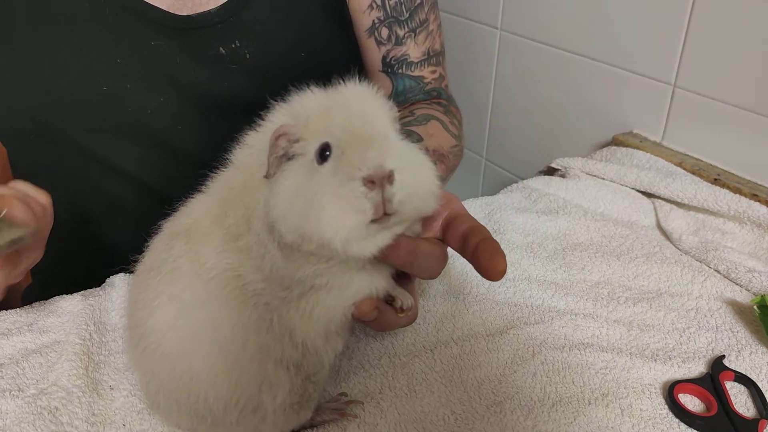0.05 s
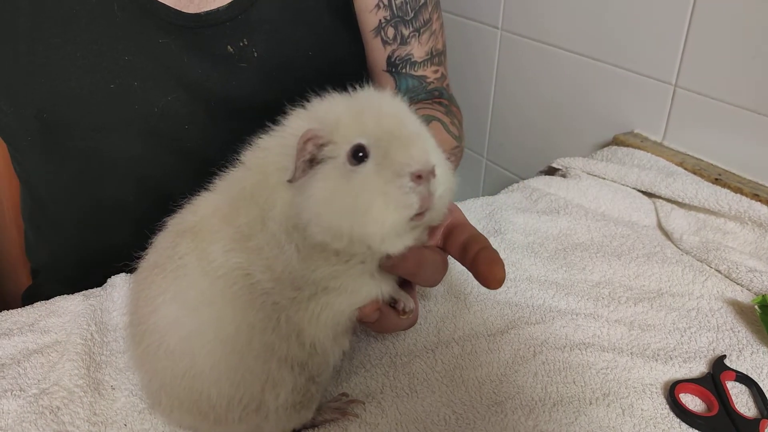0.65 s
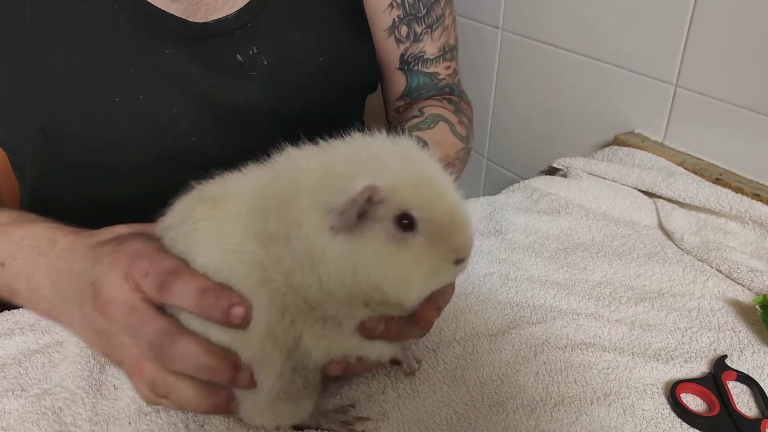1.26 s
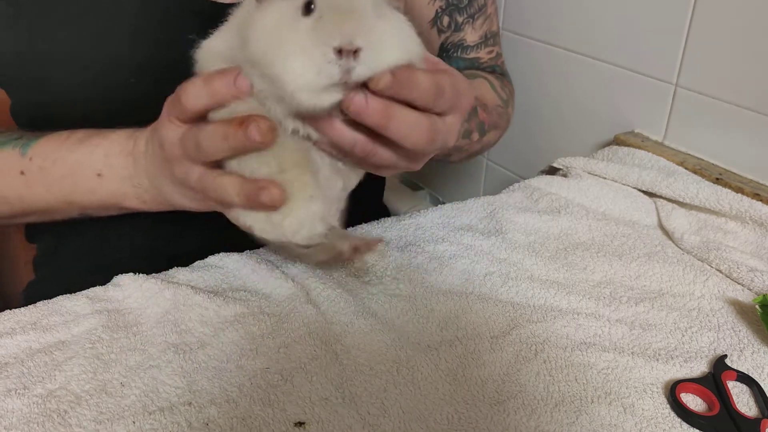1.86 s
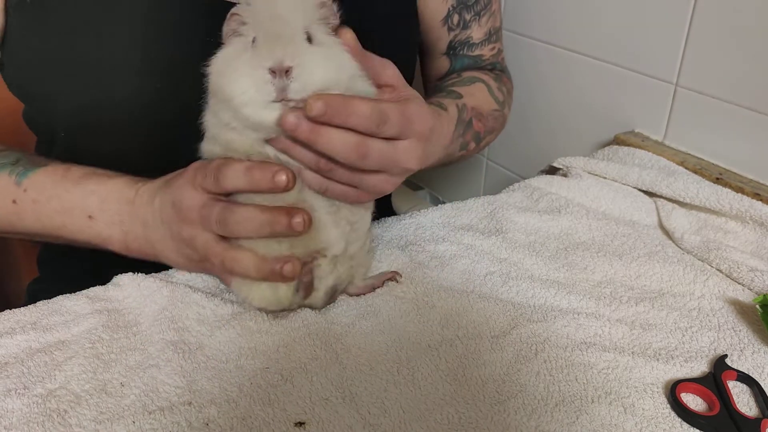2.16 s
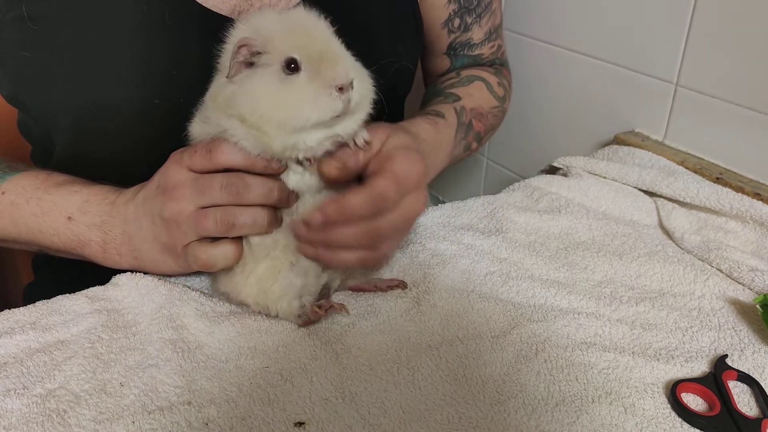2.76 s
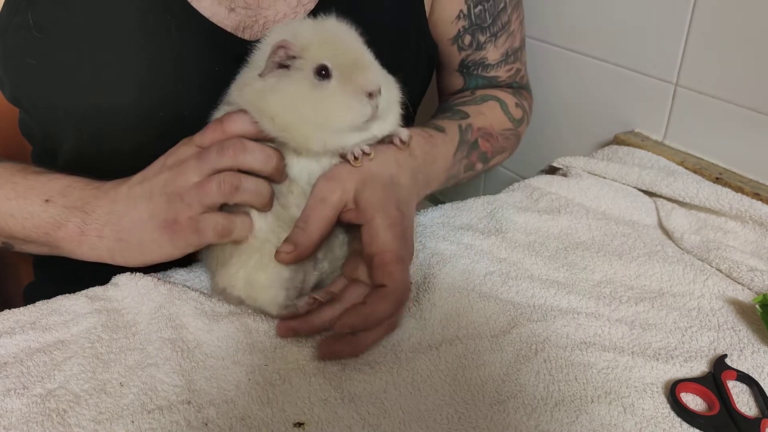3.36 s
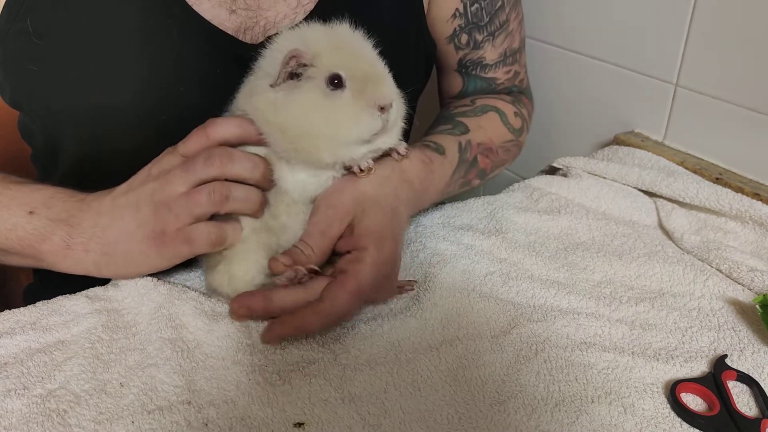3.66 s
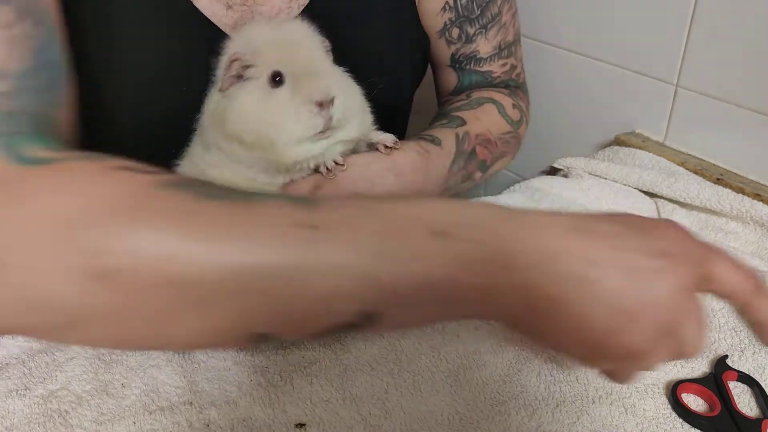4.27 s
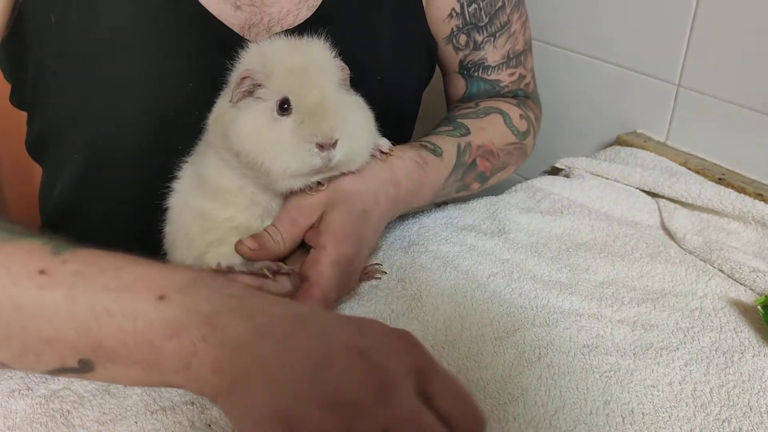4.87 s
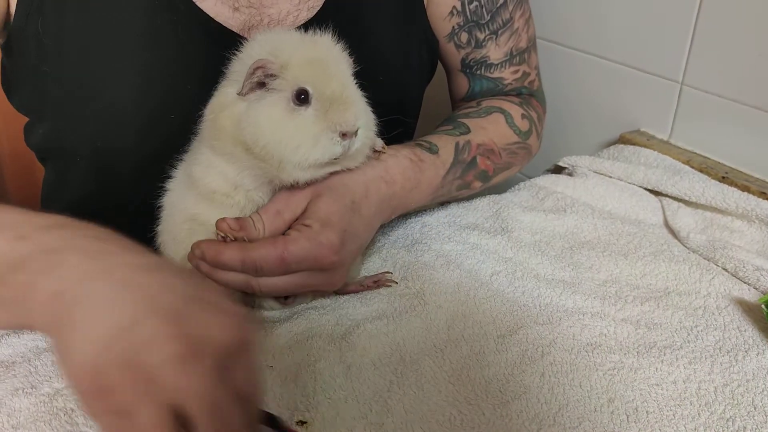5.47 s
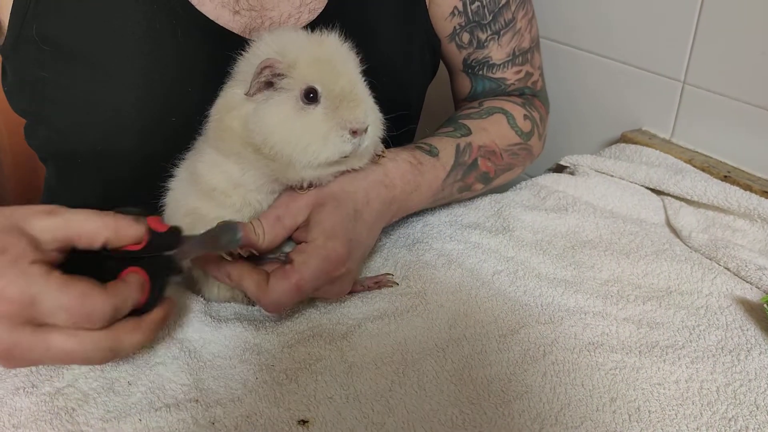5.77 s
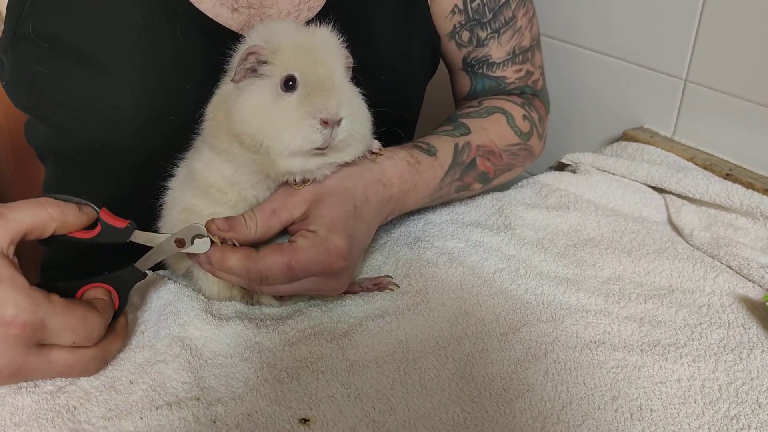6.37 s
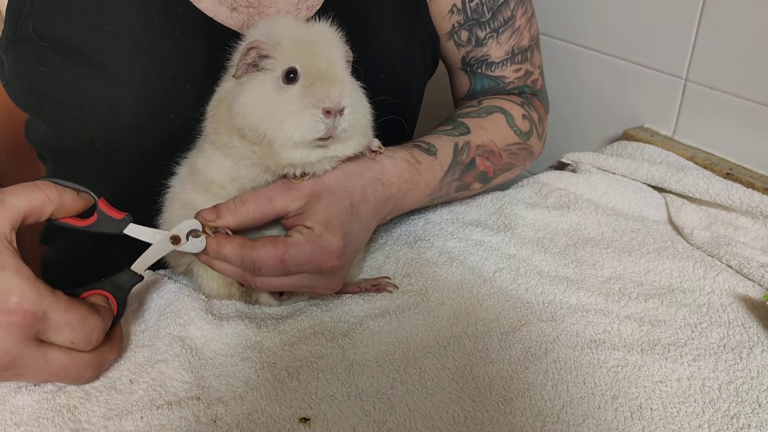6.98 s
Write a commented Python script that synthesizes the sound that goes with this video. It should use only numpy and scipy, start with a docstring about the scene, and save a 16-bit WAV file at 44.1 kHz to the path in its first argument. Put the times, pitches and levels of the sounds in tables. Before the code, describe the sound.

Faint claw ticks, towel scrapes and muffled bumps come from a guinea pig being picked up and held, over steady hum and hiss. After a barely audible squeak and the brush of an arm on cloth, nail clippers hit the table with one loud, bright clack, left of centre, echoing briefly off tiled walls. The arm slides back, small ticks and scuffs resume, and the microphone is lightly bumped.

```python
"""A small tiled room, two microphones, a guinea pig on a towel-covered table; hum and hiss throughout.
From 1 s the animal is lifted and held: fur and towel rustle, claws tick and scuff, with soft low bumps.
Near 3 s comes one faint squeak. An arm slides out for the nail clippers, and just after 5 s they knock
once, hard, on the table, left of centre; the room rings with it. The arm slides back, a few more ticks
and scuffs follow as the animal shifts, and a light handling bump on the microphone comes last."""
import sys
import numpy as np
from scipy import signal
from scipy.fft import rfft, irfft, next_fast_len
from scipy.io import wavfile

SR = 44100
rng = np.random.default_rng(int(sys.argv[2]) if len(sys.argv) > 2 else 0)


def output_pcm(signal):
    """Save a mono or channel-first signal as 16-bit PCM at the path in sys.argv[1].

    Samples are clipped to [-1, 1] before scaling.
    """
    pcm = np.clip(np.atleast_2d(signal).T, -1, 1) * 32767
    wavfile.write(sys.argv[1], SR, np.round(pcm).astype(np.int16))


N = 319284
TIME = np.arange(N) / SR


# clippers on the table, first touch, full blow and an early reflection 12 ms later: t/s, relative level/dB
KNOCK_HITS = [(5.1252, -16), (5.1262, 1), (5.1376, -11)]
# spectrum of the crack at the microphones: f/Hz, relative level/dB, left minus right/dB
KNOCK_COLOUR = [(35, -36, -0.5), (65, -23.5, 2), (140, -21, -2), (282, -14.5, -4.5), (405, -5, -2.5),
                (653, -5, 3.5), (1290, -8.5, 1.5), (1900, -3.5, 3.5), (2300, -2, 3.5), (3100, -3.5, 4.5),
                (3920, -13.5, 2), (5140, -25, -4), (6980, -42, -1), (14000, -52.5, -2.5)]

def knock(room, crack_db, wet_db, clack_db, clack_hz, clack_s, clack_wet_db, left_db):
    """Metal meets the table: a broad crack, and a bright clack that swells and dies in a few cycles."""
    t, crack, clack = TIME[:SR // 20], np.zeros((2, N)), np.zeros(N)
    spectra = [[(hz, db + side * left / 2) for hz, db, left in KNOCK_COLOUR] for side in (1, -1)]
    snap = np.array([impact(spectrum) for spectrum in spectra])
    swell = (t / clack_s) ** 2 * np.exp(2 - 2 * t / clack_s)
    burst = swell * np.sin(2 * np.pi * clack_hz * t)
    for s, db in KNOCK_HITS:
        add(crack, s, from_db(crack_db + db) * snap / np.linalg.norm(snap))
        add(clack, s, from_db(clack_db + db) * burst)
    return in_room(crack, room, wet_db) + pan(left_db) * in_room(clack, room, clack_wet_db)


# modes of table, clippers and room at the microphones: f/Hz, relative level/dB, left minus right/dB
KNOCK_MODES = [(71, -13, 5), (121, -13, 1), (181, -12, -3), (266, -10, -3), (331, -13, -3), (398, -8, 0),
               (488, -10, -5), (602, -8, 7), (715, -5, 0), (814, -8, -2), (858, -5, 5), (983, -5, 9),
               (1033, -7, -2), (1129, -4, -4), (1413, -5, 1), (1472, -5, 2), (1736, -6, -1), (2127, 0, 1),
               (2172, -3, 9), (2289, 0, 9), (2335, -4, 8), (2455, -4, 7), (2538, -3, 6), (2632, -5, 9),
               (2715, 0, 2), (2816, -4, 9), (2874, -5, 9), (3155, -5, 3), (3324, -6, 9), (6045, -31, -2),
               (7332, -34, -1), (7763, -35, 0), (8500, -37, -3), (8985, -35, -1)]

def ringing(ring_db, t60_ratio, right_lead_s):
    """The modes left sounding by the full blow; they last about as long as the room does."""
    t, out = TIME[:SR], np.zeros((2, N))
    blow_s = KNOCK_HITS[1][0]
    onset = 1 - np.exp(-t / 0.0026)
    for (hz, db, left_db), (phase, slant) in zip(KNOCK_MODES, rng.random((len(KNOCK_MODES), 2))):
        # each wave crosses the pair at its own slant and reaches the right microphone slightly earlier
        lead = np.array([[0], [right_lead_s * (1 - .5 * slant ** 2)]])
        t60 = t60_ratio * at_hz(ROOM_T60, hz)
        fade = from_db(ring_db + db - 60 * t / t60)
        tone = np.sin(2 * np.pi * (hz * (t + lead) + phase))
        add(out, blow_s, pan(left_db) * fade * onset * tone)
    return out


# claws and clipper handles, centred between the microphones: t/s, level/dB, f/Hz
TICKS = [(0.9812, -36, 2830), (0.9868, -35.5, 1810), (1.247, -41, 2780), (2.6885, -41, 3020),
         (3.020, -44, 1630), (3.7724, -34.5, 2580), (6.642, -39, 3600), (6.768, -48, 1700),
         (7.1575, -38.5, 3300)]

def ticks(t60_cycles):
    """Small hard contacts all ring for the same number of cycles, so higher ones are shorter."""
    return taps([(s, db, hz, t60_cycles / hz) for s, db, hz in TICKS], contact_cycles=0.047)


# soft low bumps, a brief low rub near 3.5 s and, last, a handling bump on the microphone:
# t/s, level/dB, hardness/(dB per octave)
BUMPS = [(0.981, -53, -1), (1.247, -39.5, -3.5), (1.320, -55.5, -9), (1.478, -46.5, 3.5), (3.515, -52, 0.5),
         (4.430, -47, -3.5), (4.530, -55, -4.5), (5.597, -38.5, 3), (7.157, -50, 2)]
# low modes of the padded table, also voicing the rub and the handling bump: f/Hz, relative level/dB, t60/s
LOW_MODES = [(62, -4.5, .17), (146.2, 1, 0.051), (314, 1, .04), (491, -4, 0.042)]

def low_bumps(pivot_hz, lag_cycles):
    """Each soft contact sounds the same few low modes; harder ones favour those above the pivot."""
    rings = []
    for s, db, hardness in BUMPS:
        for hz, mode_db, t60 in LOW_MODES:
            start = s + lag_cycles / hz   # low modes start later
            rings.append((start, db + mode_db + hardness * np.log2(hz / pivot_hz), hz, t60))
    return taps(rings, contact_cycles=.4)


# claws and hands scraping the towel: t/s, level/dB, fade/s, brightness/(dB per octave)
SCUFFS = [(1.468, -51, 0.042, -2.5), (1.535, -42.5, 0.035, 3), (1.568, -50, 0.022, -4.5),
          (2.688, -47.5, .004, 1), (3.980, -50.5, 0.018, -0.5), (5.600, -47, 0.033, -4.5),
          (6.642, -49.5, 0.033, -1), (6.982, -51, 0.029, 2.5), (7.157, -46.5, 0.012, 3)]
# spectrum of a scrape: f/Hz, relative level/dB
SCUFF_COLOUR = [(100, -23), (400, -2), (900, -1.5), (1400, -7), (2700, -0.5), (3400, -3.5), (4200, -11),
                (7000, -15), (10000, -29.5), (14000, -33)]

def scuffs(grain_db, catch_db, catches_per_s, rise_s):
    """Loops of towel catch and let go: uneven clumps of fine grains."""
    t, out = TIME[:SR // 3], np.zeros((2, N))
    for s, db, fade_s, tilt_db in SCUFFS:
        catching = catch_db * wander(catches_per_s, len(t))
        grains = diffuse(len(t)) * from_db(grain_db * rng.standard_normal(len(t)) + catching)
        stroke = from_db(db) * np.minimum(t / rise_s, 1) * np.exp(-t / fade_s)
        add(out, s - rise_s / 2, stroke * colour(grains, SCUFF_COLOUR, tilt_db))
    return out


# the animal is lifted or its weight is shifted on the table: t/s, level/dB, settling/s
BODY_SHIFTS = [(1.49, -60, .22), (1.9, -65.5, 1.2), (3.53, -63, .35), (5.7, -64, .25), (7.18, -63, .3)]
# spectrum of fur on the towel: f/Hz, relative level/dB
FUR_COLOUR = [(100, -10.5), (320, 0.5), (800, -11.5), (1500, -10), (2700, -27), (5000, -26), (14000, -52)]

def fur_rustle(rise_s, rest_db):
    """Fur rubs on the towel; each move builds up quickly and settles slowly."""
    moves = [from_db(db) * np.exp(np.minimum((TIME - s) / rise_s, (s - TIME) / settle_s))
             for s, db, settle_s in BODY_SHIFTS]
    return rubbing(moves, rest_db, FUR_COLOUR, uneven_db=3, slips_per_s=37)


# the arm reaches for the clippers and comes back: t/s at greatest speed, level/dB, length/s
ARM_STROKES = [(4.77, -59, .68), (5.43, -61, 0.57)]
# spectrum of skin on cloth: f/Hz, relative level/dB
SKIN_COLOUR = [(300, -29), (1400, -6), (2700, 10.5), (4500, 2), (7000, 0), (9000, -18.5), (14000, -6)]

def arm_slide(rest_db):
    """Skin rubs on cloth, each stroke one smooth arch of speed; at rest the hands hold the animal."""
    moves = [from_db(db) * np.cos(np.pi * np.clip((TIME - s) / length_s, -.5, .5))
             for s, db, length_s in ARM_STROKES]
    return rubbing(moves, rest_db, SKIN_COLOUR, uneven_db=3, slips_per_s=90)


# a faint squeak, centred: t/s, length/s, level/dB, first f/Hz, last f/Hz
SQUEAK = (2.94, 0.05, -65.5, 1379.5, 1721)

def squeak(waver_hz, wavers_per_s):
    """One thin, unsteady tone that swells and fades as its pitch rises."""
    s, length_s, db, first_hz, last_hz = SQUEAK
    along = np.clip((TIME - s) / length_s, 0, 1)
    hz = first_hz + (last_hz - first_hz) * along + waver_hz * wander(wavers_per_s)
    return from_db(db) * np.sin(np.pi * along) * np.sin(2 * np.pi * np.cumsum(hz) / SR)


# room tone at both microphones: f/Hz, relative level/dB
ROOM_TONE = [(20, 17), (60, 14), (110, 16), (200, 6), (450, 2.5), (850, 1.5), (1300, -5), (1700, -2),
             (2250, 5.5), (3100, -4), (4200, -12.5), (6500, -27), (8300, -23), (14000, -17.5)]
# hiss in the right channel alone: f/Hz, relative level/dB
RIGHT_HISS = [(1500, -38), (3000, 1.5), (3600, 6.5), (4500, 5.5), (4950, 9.5), (5600, -2.5), (7000, -18.5),
              (9000, -65)]
# mains hum, centred: f/Hz, relative level/dB
MAINS_HUM = [(99, -61), (199, -76), (299, -76)]

def background(air_db, air_left_db, hiss_db, hum_db, waver_rad):
    """Room tone from all sides, a band of hiss on the right, and a slightly wavering hum."""
    air = from_db(air_db) * pan(air_left_db) * colour(diffuse(N), ROOM_TONE)
    air[1] += from_db(hiss_db) * colour(rng.standard_normal(N), RIGHT_HISS)
    waver = waver_rad * wander(per_s=4)
    hum = sum(from_db(db + hum_db) * np.sin(2 * np.pi * hz * TIME + waver) for hz, db in MAINS_HUM)
    return air + np.sqrt(2) * hum


# decay of the small tiled room: f/Hz, t60/s
ROOM_T60 = [(60, 0.52), (300, 0.48), (800, 0.44), (1400, 0.43), (2700, 0.34), (5000, .34), (12000, 0.22)]

def room_response():
    """Dense echoes off the nearby tiles, each octave dying at its own rate; energy about 1 a side."""
    t, hz = TIME[:SR], np.maximum(np.fft.rfftfreq(SR, 1 / SR), 1)
    echoes, tail = rfft(diffuse(SR)), 0
    for centre in 2. ** np.arange(5, 15):
        band = irfft(echoes * np.maximum(0, 1 - abs(np.log2(hz / centre))), SR)
        tail = tail + band * from_db(-60 * t / at_hz(ROOM_T60, centre))
    onset = 1 - np.exp(-t / 0.00068)
    return unit_rms(tail * onset) / np.sqrt(SR)


# how alike the two microphones hear diffuse sound: f/Hz, correlation
MIC_LIKENESS = [(30, 0.24), (110, 0.27), (290, 0.62), (620, 0.38), (1300, -0.064), (2600, 0.2),
                (6000, 0.14), (14000, -0.049)]

def diffuse(count):
    """White noise arriving from all sides at two microphones."""
    size = next_fast_len(count)
    mid, side = rfft(rng.standard_normal((2, size)))
    alike = np.clip(at_hz(MIC_LIKENESS, np.fft.rfftfreq(size, 1 / SR)), -.99, .99)
    pair = np.sqrt(1 + alike) * mid + np.sqrt(1 - alike) * side * [[1], [-1]]
    return unit_rms(irfft(pair, size)[:, :count])


def in_room(x, room, wet_db):
    """The direct path to the microphones plus the echoes."""
    return x + from_db(wet_db) * signal.fftconvolve(np.atleast_2d(x), room, axes=1)[:, :N]


def impact(spectrum, size=4096):
    """The most abrupt causal pulse with this spectrum."""
    gain = from_db(at_hz(spectrum, np.fft.rfftfreq(size, 1 / SR)))
    cepstrum = irfft(np.log(gain))
    folded = np.r_[cepstrum[0], 2 * cepstrum[1:size // 2]]
    return irfft(np.exp(rfft(folded, size)))


def taps(rings, contact_cycles):
    """Each touch is one damped vibration; a soft contact takes longer to build it up."""
    t, out = TIME[:SR // 2], np.zeros(N)
    for s, db, hz, t60 in rings:
        onset = 1 - np.exp(-t * hz / contact_cycles)
        fade = from_db(db - 60 * t / t60)
        add(out, s, fade * onset * np.sin(2 * np.pi * hz * t))
    return out


def rubbing(moves, rest_db, spectrum, uneven_db, slips_per_s):
    """Friction noise that rises with each move and flutters as cloth sticks and slips."""
    effort = np.sqrt(from_db(rest_db) ** 2 + sum(move ** 2 for move in moves))
    grip = from_db(uneven_db * wander(slips_per_s))
    return effort * colour(diffuse(N) * grip, spectrum)


def colour(x, spectrum, tilt_db=0):
    """Give noise a spectrum, tilted per octave about 2 kHz; rms 1."""
    size = next_fast_len(x.shape[-1])
    hz = np.maximum(np.fft.rfftfreq(size, 1 / SR), 1)
    gain = from_db(at_hz(spectrum, hz) + tilt_db * np.log2(hz / 2000))
    return unit_rms(irfft(rfft(x, size) * gain, size)[..., :x.shape[-1]])


def wander(per_s, count=N):
    """Random values joined by straight lines."""
    return np.interp(TIME[:count] * per_s, np.arange(count), rng.standard_normal(count))


def at_hz(points, hz):
    """Read a table on a log-frequency axis."""
    table = np.array(points)
    return np.interp(np.log(np.maximum(hz, 1)), np.log(table[:, 0]), table[:, 1])


def from_db(db):
    """Decibels to gain."""
    return 10 ** (np.asarray(db) / 20)


def unit_rms(x):
    """Scale to rms 1."""
    return x / np.sqrt(np.mean(x ** 2) + 1e-20)


def pan(left_db):
    """Channel gains for a left-minus-right level."""
    return from_db([[left_db / 2], [-left_db / 2]])


def add(track, s, sound):
    """Mix a sound into a track from time s."""
    start = int(s * SR)
    track[..., start:start + sound.shape[-1]] += sound[..., :N - start]


def scene():
    """The table and the tiled room around it, heard from one microphone position."""
    room = room_response()
    clippers = knock(room, crack_db=3.5, wet_db=10,
                     clack_db=-8.7, clack_hz=2490, clack_s=0.00066, clack_wet_db=-13.5, left_db=8)
    ring = ringing(ring_db=-25, t60_ratio=0.88, right_lead_s=.00039)
    claws = in_room(ticks(t60_cycles=10.8), room, wet_db=-1.5)
    bumps = in_room(low_bumps(pivot_hz=200, lag_cycles=0.79), room, wet_db=-3.5)
    scrapes = in_room(scuffs(grain_db=4, catch_db=-0.5, catches_per_s=359, rise_s=.006), room, wet_db=-5.5)
    fur = fur_rustle(rise_s=0.087, rest_db=-75.5)
    arm = arm_slide(rest_db=-71)
    steady = background(air_db=-59.5, air_left_db=-0.4, hiss_db=-59.5, hum_db=-3, waver_rad=0.35)
    chirp = in_room(squeak(waver_hz=140.3, wavers_per_s=700), room, wet_db=-4)
    return clippers + ring + claws + bumps + scrapes + fur + arm + chirp + steady


def record(dry):
    """Both microphone channels are cut steeply above 14.4 kHz."""
    return signal.sosfilt(signal.ellip(10, .1, 70, 14400, fs=SR, output="sos"), dry)


dry = scene()
out = record(dry)
output_pcm(out)
```